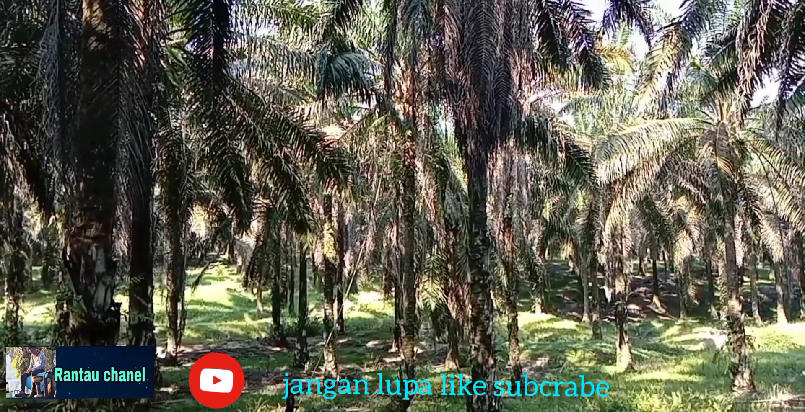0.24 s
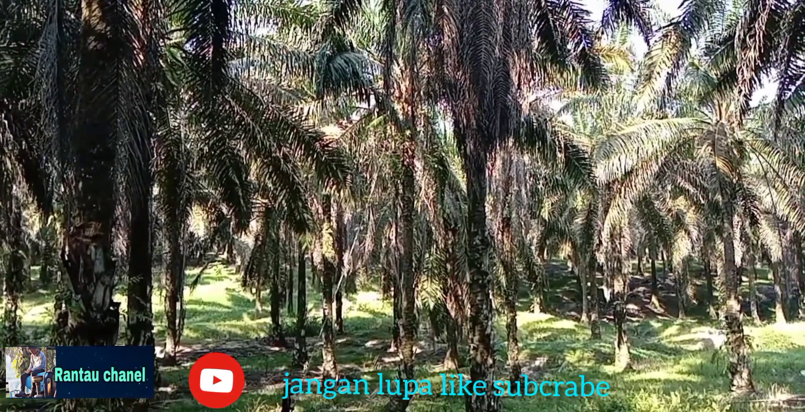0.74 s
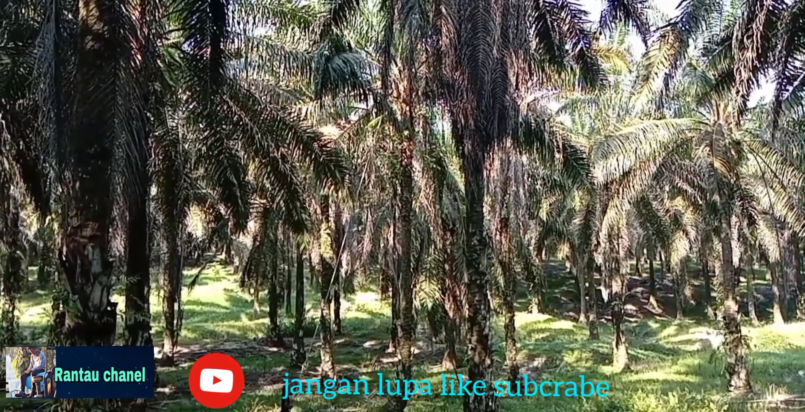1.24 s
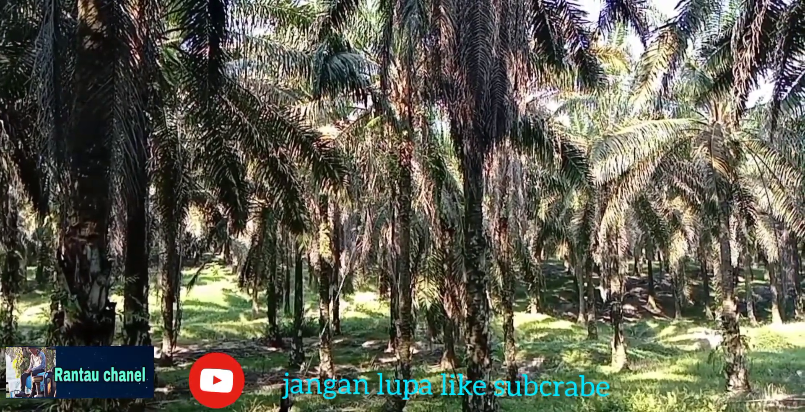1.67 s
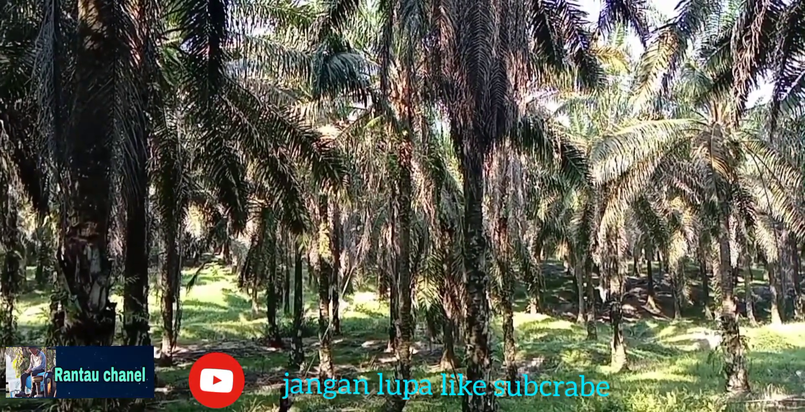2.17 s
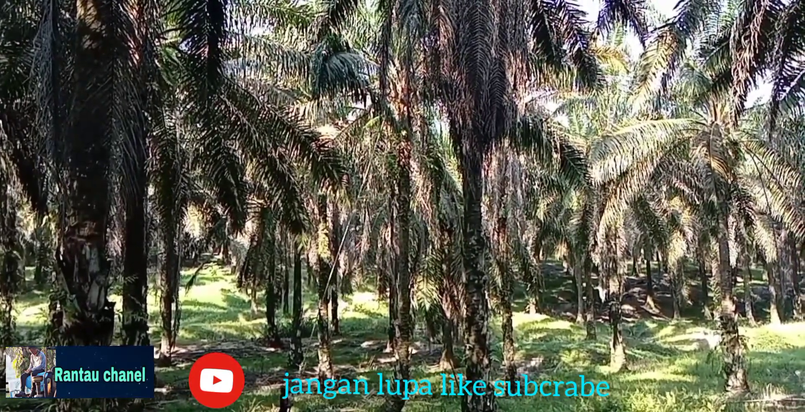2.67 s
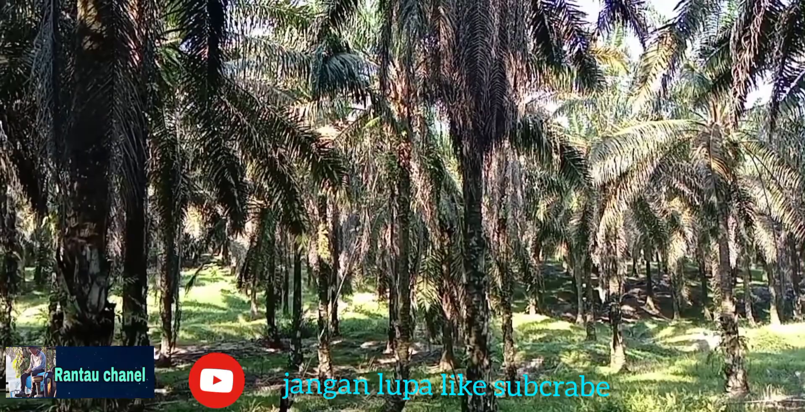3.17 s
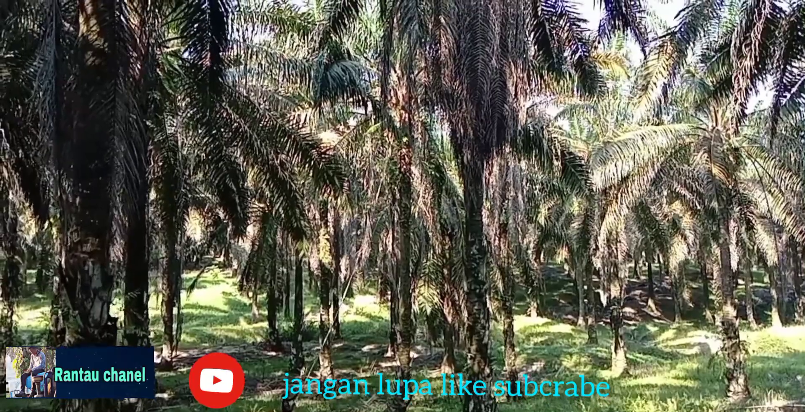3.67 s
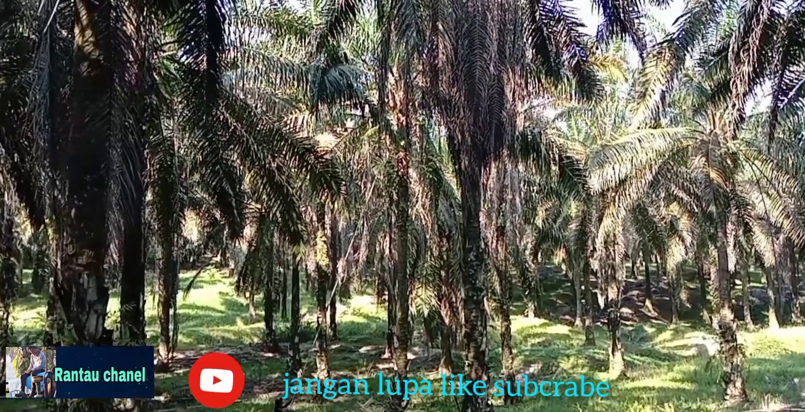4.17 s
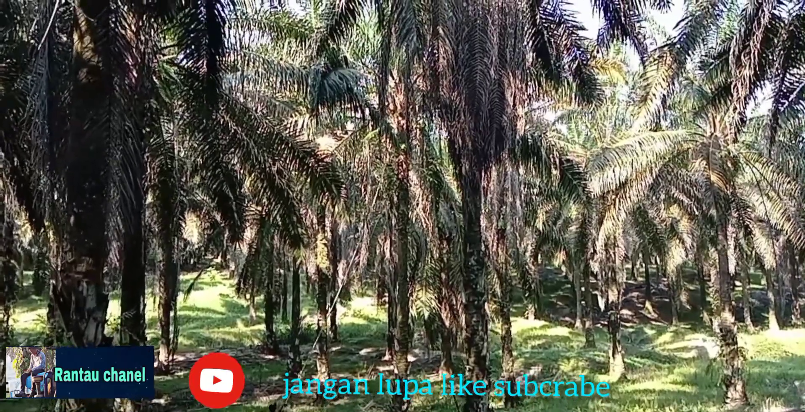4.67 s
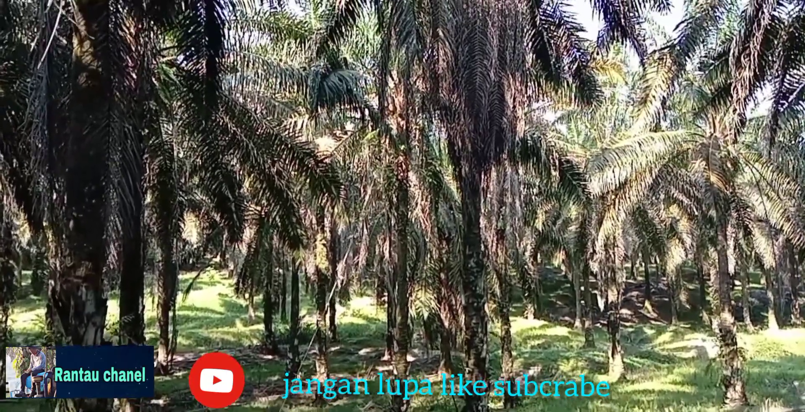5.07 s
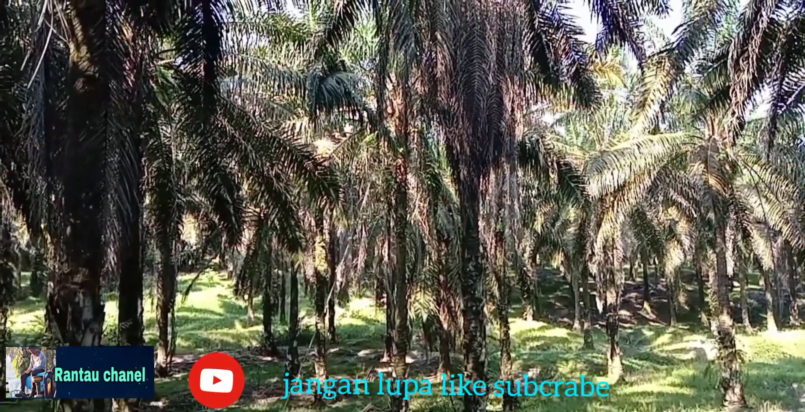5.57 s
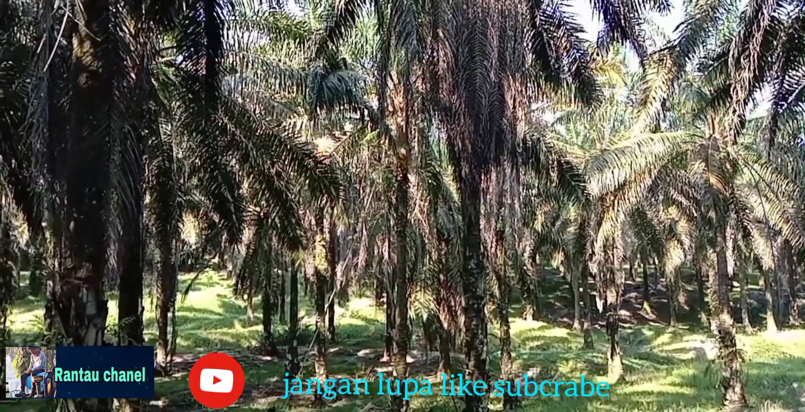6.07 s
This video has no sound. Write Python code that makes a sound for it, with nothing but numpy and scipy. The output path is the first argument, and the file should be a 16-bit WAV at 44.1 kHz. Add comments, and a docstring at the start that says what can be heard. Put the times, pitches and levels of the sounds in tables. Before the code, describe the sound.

Outdoors in a palm grove, a high insect buzz holds steady with crickets trilling in short pulsing bouts. Faint bird notes and twig ticks come first, then a clear gliding whistled phrase in the middle. Dry stalk snaps thicken afterwards, with two crackling frond swishes late on. A very faint far engine putters below. The microphone stays still, with light echo from trunks.

```python
"""Palm plantation with insects and a bird

A shrill insect chorus, from ringing tooth strikes, holds steady while crickets trill in gliding pulses.
A bird whistles a phrase of gliding tones; noise bursts ring dry stalks, and a falling tone is a twig tick.
Twice a frond swishes as a crowd of clicks; leaves rustle in a bed of rumble and hiss. Far off an engine
putters and a motor drones in rising tones. Trunks scatter the crickets, the bird and the snaps."""
import sys
import numpy as np
from scipy import signal
from scipy.fft import rfft, irfft
from scipy.io import wavfile
from scipy.ndimage import uniform_filter1d

SR = 44100
rng = np.random.default_rng(int(sys.argv[2]) if len(sys.argv) > 2 else 0)


def wav_out(sig):
    """Save sig, one row per channel (or a flat mono array), as 16-bit PCM at SR to the path in sys.argv[1]."""
    wavfile.write(sys.argv[1], SR, np.round(np.clip(np.atleast_2d(sig).T, -1, 1) * 32767).astype(np.int16))


N = 279594
TIME = np.arange(N) / SR  # s
BINS = np.fft.rfftfreq(N, 1 / SR)  # Hz


def amp(db):
    """Decibels to gain."""
    return 10 ** (np.asarray(db) / 20)


def unit(x):
    """Scales to rms 1."""
    return x / np.sqrt(np.mean(x ** 2) + 1e-20)


def follow(rows, t=TIME):
    """Reads every column of a breakpoint curve at times t."""
    s, *columns = np.transpose(rows)
    return [np.interp(t, s, column) for column in columns]


def add(mix, s, sound):
    """Mixes a sound in at time s, cut off at the end of the mix."""
    part = mix[max(round(s * SR), 0):][:len(sound)]
    part += sound[:len(part)]


def colour(x, spectrum):
    """Shapes x with a spectrum drawn over log frequency, at rms 1."""
    hz, db = np.transpose(spectrum)
    gain = amp(np.interp(np.log(BINS + 1), np.log(hz + 1), db))
    return unit(irfft(rfft(x) * gain, N))


def wander(rate_hz):
    """Random modulation of rms 1: noise rolled off smoothly around rate_hz."""
    rolloff = np.exp(-(BINS / rate_hz) ** 2)
    return unit(irfft(rfft(rng.standard_normal(N)) * rolloff, N))


def grains(per_s, spread_db):
    """Random clicks of uneven size and either sign, at rms 1."""
    size = amp(spread_db * np.minimum(rng.exponential(1, N), 4))
    sign = rng.choice([-1, 1], N)
    return unit(size * sign * (rng.random(N) < per_s / SR))


def ring(x, modes, order=2):
    """Passes x through parallel band-pass resonances, each (pitch_hz, width_hz, gain_db)."""
    out = 0
    for hz, width, db in modes:
        edges = np.clip([hz - width / 2, hz + width / 2], 10, SR / 2 - 10)
        band = signal.butter(order, edges, "band", fs=SR, output="sos")
        out = out + amp(db) * signal.sosfilt(band, x)
    return out


def grove(x, t60, onset):
    """Echoes from trunks and crowns: sparse taps that build up and die away."""
    t = TIME[:SR]
    taps = rng.standard_normal(SR) * (rng.random(SR) < 1500 / SR)
    taps = taps * amp(-60 * t / t60) * (1 - np.exp(-t / onset))
    return signal.fftconvolve(x, taps / np.linalg.norm(taps))[:N]


def whistle(curve, waver, edge=0.001):
    """A gliding near-sine with soft ends, its pitch wavering at random by the fraction waver."""
    start, end = curve[0][0], curve[-1][0]
    t = np.arange(start, max(end, start + edge), 1 / SR)
    hz, db = follow(curve, t)
    drift = unit(uniform_filter1d(rng.standard_normal(SR), size=130))[:len(t)]
    ends = np.clip(np.minimum(t - t[0], t[-1] - t) / edge, 0, 1)
    phase = 2 * np.pi * np.cumsum(hz * (1 + waver * drift)) / SR
    return np.sqrt(2) * amp(db) * ends * np.sin(phase)


# Spectrum of the rumble and hiss: frequency_hz, relative gain_db
AIR_SPECTRUM = [(25, -19), (45, -14), (90, 2), (160, 1.5), (240, -4.5), (330, -12), (600, -29),
                (1100, -26.5), (2000, -32), (3200, -19.5), (4100, -26), (5800, -17), (7400, -25.5),
                (8000, -41), (9000, -35.5), (12000, -42.5), (15500, -27)]
# Spectrum of the leaf crackle: frequency_hz, relative gain_db
LEAF_SPECTRUM = [(240, -44), (400, -6.5), (619, -8), (671, -11), (1230, -3.5), (1780, -5), (2040, -5.5),
                 (2280, -11.5), (3320, 2.5), (3970, -6.5), (4300, -5.5), (5590, 3), (9460, -120)]
# Brief rustles of leaves: peak_s, level_db, length_s
LEAF_RUSTLES = [(0, -54, 0.21), (1.068, -74, 0.83), (1.537, -58.5, 0.13), (1.804, -66.5, .2),
                (3.045, -59, 0.12), (3.75, -58.5, 0.44), (4.676, -63, 0.22), (4.9, -39.5, 0.055),
                (5.273, -57.5, 0.68), (6.041, -47.5, 0.22)]
RUSTLE_RISE_DB, RUSTLE_FALL_DB = 19.5, 13.5  # change over one length before and after the peak
LEAVES_FLOOR_DB = -79.5  # what the crackle keeps between rustles
STIR_FLOOR_DB, STIR_SHARE = -78.5, 0.17  # fixed part, plus this share of the crackle's gain


def air():
    """Noise shaped into rumble and hiss, with leaves as crackling clicks over a duller, banded stirring."""
    rustle = amp(LEAVES_FLOOR_DB)
    for peak, db, length in LEAF_RUSTLES:
        swell_db = np.minimum(RUSTLE_RISE_DB * (TIME - peak), RUSTLE_FALL_DB * (peak - TIME)) / length
        rustle = rustle + amp(db + swell_db)
    hiss = amp(-61.5) * colour(rng.standard_normal(N), AIR_SPECTRUM) * amp(2.4 * wander(9.0))
    stirring = np.zeros(N)
    for hz in np.geomspace(500, 2400, 7):  # each band stirs on its own
        stirring += ring(rng.standard_normal(N), [(hz, .3 * hz, 0)]) * amp(4 * wander(12))
    stir_gain = amp(STIR_FLOOR_DB) + STIR_SHARE * rustle
    return hiss + stir_gain * unit(stirring) + rustle * colour(grains(4000, 2.25), LEAF_SPECTRUM)


# Spells of a distant motor: start_s, end_s, first_pitch_hz, last_pitch_hz, level_db (before it wavers)
DRONE_SPELLS = [(-.2, 1.8, 61.5, 67, -68), (2.2, 3.48, 58.8, 59.5, -67.5), (3.98, 5.08, 47.8, 61.4, -68),
                (5.3, 5.9, 53, 58.26, -72), (6.0, 7, 49.6, 52, -75)]
DRONE_FADE_S = 0.12


def drone():
    """A distant motor hums as a low sine, gaining speed in each spell while its level wavers."""
    out = np.zeros(N)
    for start, end, first_hz, last_hz, db in DRONE_SPELLS:
        hz = np.interp(TIME, [start, end], [first_hz, last_hz])
        ends = np.clip(np.minimum(TIME - start, end - TIME) / DRONE_FADE_S, 0, 1)
        out += np.sqrt(2) * amp(db) * ends * np.sin(2 * np.pi * np.cumsum(hz) / SR)
    return out * amp(1.4 * wander(4.9))


# Speed of the far engine: time_s, firings_per_s
FIRING_RATE = [(0.0, 23.2), (0.88, 21.5), (1.2, 23), (1.43, 21.2), (1.87, 21.5), (2.31, 20.7), (2.93, 22.9),
               (3.58, 20.7), (3.81, 20.1), (4.18, 20.7), (4.5, 23.7), (5.0, 21.5), (5.35, 23.5), (5.74, 23),
               (5.91, 24.5), (6.34, 21.6)]
# Engine levels before the final trims: time_s, throb_db, thump_db (the harder upper thumps)
ENGINE_LEVELS = [(0.0, -58, -63), (0.05, -58.5, -69), (0.81, -59, -61.5), (1.94, -58, -69.5),
                 (1.98, -71, -71), (2.42, -57, -71.5), (2.83, -62, -62.5), (3.14, -67, -56.5),
                 (3.27, -58.5, -75), (3.34, -67.5, -60), (4.57, -57.5, -68.5), (4.59, -56, -57.5),
                 (5.14, -62, -59), (5.17, -68, -67), (5.24, -55.5, -83), (5.91, -63, -70), (5.95, -58, -59),
                 (6.34, -62, -73)]
# Partials of the throb: multiple of the firing rate, relative level_db
THROB_PARTIALS = [(2, -16.5), (4, -19), (5, 6), (6, 6.5), (7, -5)]
# Exhaust resonances: pitch_hz, width_hz, relative gain_db
EXHAUST_MODES = [(140.7, 54, -6.5), (207.2, 43, -1.5), (339.6, 26, -13)]


def engine():
    """A far single cylinder: uneven firing pulses ring its exhaust, over a throb of firing-rate harmonics."""
    (rate,), (throb_db, thump_db) = follow(FIRING_RATE), follow(ENGINE_LEVELS)
    turns = np.cumsum(rate) / SR  # firings so far
    firings = np.diff(np.floor(turns), prepend=0) * amp(2.5 * wander(25))
    thumps = unit(ring(firings, EXHAUST_MODES))
    throb = np.zeros(N)
    for multiple, db in THROB_PARTIALS:
        throb += amp(db + 1.8 * wander(4)) * np.cos(2 * np.pi * multiple * (turns - .2))
    return amp(throb_db - 1.0) * unit(throb) + amp(thump_db - 2.5) * thumps


# Insect bands: centre_hz, width_hz, level_db, strikes_per_s (a quarter of the band's total strike rate)
INSECT_BANDS = [(6702, 390, -60, 900), (7132, 340, -66, 1800), (4840, 570, -65.5, 250),
                (14690, 550, -74.5, 1500)]


def chorus():
    """Many insects: dense tooth strikes ring their wings, each kind in its own band."""
    out = np.zeros(N)
    for hz, width, db, strikes in INSECT_BANDS:
        wings = unit(ring(grains(4 * strikes, 0.4), [(hz, width, 0)]))
        out += amp(db + .5 * wander(11.0)) * wings
    return out


def trill(bouts, fall_hz, stroke, gap, uneven_db):
    """Pairs of wing strokes, each sliding down as the wing slows; a bout swells in and eases off."""
    out, u = np.zeros(N), np.linspace(0, 1, int(stroke * SR))
    for start, end, rate, db, top_hz in bouts:
        for s in np.arange(start, end, 1 / rate):
            ease_db = -6 * np.exp(-(s - start) / 0.058) - 2 * np.exp(-(end - s) / 0.04)
            for delay in (0, gap):
                late, size, detune, slide = rng.standard_normal(4)
                hz = top_hz * (1 + .006 * detune) - fall_hz * (1 + .1 * slide) * u ** 1.6
                pulse = np.sin(np.pi * u) * np.sin(2 * np.pi * np.cumsum(hz) / SR)
                gain = np.sqrt(2) * amp(db + ease_db + uneven_db * size)
                add(out, s + delay + .0007 * late, gain * pulse)
    return out


# Bouts of two near crickets, one lower: start_s, end_s, pulse_pairs_per_s, level_db (before trim), top_pitch_hz
CRICKET_BOUTS = [(.001, .07, 22, -52, 4970), (.17, 1.0, 23, -61.5, 4750), (.508, 1.13, 22, -55, 4950),
                 (1.603, 2.14, 22.1, -54.5, 4950), (1.65, 2.2, 23, -61, 4700), (2.68, 3.2, 22, -57.5, 4900),
                 (2.65, 3.2, 23, -62, 4700), (3.705, 4.08, 21.8, -55.5, 4930), (4.07, 4.7, 23, -59, 4720),
                 (4.362, 4.84, 22, -54.5, 4980), (5.202, 5.79, 22.7, -54, 4970),
                 (5.235, 5.7, 22.7, -60.5, 4660)]


def crickets():
    """Two crickets close by, and higher ones deeper among the palms that never stop."""
    near = trill(CRICKET_BOUTS, fall_hz=400, stroke=.012, gap=.014, uneven_db=1.0)
    high = trill([(0, 6.34, 26.5, -68, 5650)], fall_hz=750, stroke=.013, gap=.016, uneven_db=2.5)
    shrill = trill([(0, 9.2, 37, -61.0, 7050)], fall_hz=496, stroke=.009, gap=0.016, uneven_db=1.5)
    rasp = amp(1.6 * wander(350))  # the teeth of the file catch unevenly
    calls = (amp(0.3) * near + high + shrill) * rasp
    return calls + amp(-10) * grove(calls, t60=.28, onset=.004)


# Frond swishes: start_s, peak_s, level_db, rise_db_per_s, fall_db_per_s
FROND_SWISHES = [(4.765, 4.887, -38, 81, 81), (5.751, 6.065, -40.5, 56.5, 68)]
# Spectrum of the scraping leaflets: frequency_hz, relative gain_db
LEAFLET_SPECTRUM = [(1060, -61), (1800, -34.5), (2140, -21.5), (2340, -8), (3380, 7), (4470, -4),
                    (5400, -3), (6590, 2.5), (6890, -2.5), (7960, -24), (9280, -31), (12300, -24),
                    (13500, -24), (14700, -17), (15500, -9.5)]
# Spectrum of the whole frond's dull rush: frequency_hz, relative gain_db
RUSH_SPECTRUM = [(120, -48), (200, -0.5), (237, -22.5), (380, -4), (420, -19), (551, -7), (701, -10),
                 (1180, -5), (1280, -4), (2200, -10.5), (2860, -9), (4840, -120)]
SWISH_ATTACK_S, SWISH_RAGGED_DB = 0.053, 1
RUSH_DB, RUSH_SHARE = -8, 0.8  # rush against scrape at the peak; how much of the swell it follows


def fronds():
    """Dry leaflets scrape past each other in a crowd of tiny clicks, over the duller rush of the whole frond."""
    leaflets = grains(5000, 2.3) * amp(SWISH_RAGGED_DB * wander(96))
    scrape = colour(leaflets, LEAFLET_SPECTRUM)
    rush = colour(grains(3000, 0.93), RUSH_SPECTRUM)
    out = np.zeros(N)
    for start, peak, db, rise, fall in FROND_SWISHES:
        swell_db = np.minimum(rise * (TIME - peak), fall * (peak - TIME))
        contact = np.clip((TIME - start) / SWISH_ATTACK_S, 0, 1)
        out += amp(db) * contact * (amp(swell_db) * scrape + amp(RUSH_DB + RUSH_SHARE * swell_db) * rush)
    return out


# Low knock of a stalk: pitch_hz, width_hz, relative gain_db
KNOCK_MODES = [(338.5, 56, 2), (594, 91, -3)]
# Hollow ring of a stalk: multiple of its hollow pitch, width_hz, relative gain_db
HOLLOW_MODES = [(1.002, 296, -2.5), (2.1, 487, -11)]
# Bright crack of a stalk: pitch_hz, width_hz, relative gain_db
CRACK_MODES = [(3225, 1050, -2.5), (5710, 420, -7), (13000, 1600, -30.5)]
# Low knock against the hollow ring at 1 kHz; thicker, lower stalks knock harder
KNOCK_DB, KNOCK_DB_PER_OCTAVE = -11, 23
SNAP_ATTACK_S = 0.0016


def snap(crack_db, hollow_db, t60, hollow_hz):
    """A dying burst of fibre breaks that rings the stalk in three registers."""
    t = TIME[:SR // 4]
    flutter = unit(uniform_filter1d(rng.standard_normal(len(t)), size=70))
    fibres = rng.standard_normal(len(t)) * amp(2.5 * flutter)
    burst = fibres * amp(-60 * t / t60) * np.minimum(t / SNAP_ATTACK_S, 1)
    hollow = [(multiple * hollow_hz, width, db) for multiple, width, db in HOLLOW_MODES]
    knock_db = hollow_db + KNOCK_DB - KNOCK_DB_PER_OCTAVE * np.log2(hollow_hz / 1000)
    out = np.zeros(len(t))
    for modes, db in ((CRACK_MODES, crack_db), (KNOCK_MODES, knock_db), (hollow, hollow_db)):
        x = ring(burst, modes)
        loudest_rms = np.sqrt(uniform_filter1d(x ** 2, size=220).max())  # over 5 ms
        out += amp(db) * x / loudest_rms
    return out


# Loud snaps and knocks: start_s, crack_db, hollow_db, t60_s (time to die by 60 dB), hollow_pitch_hz
STALK_SNAPS = [(0.017, -50, -72, 0.043, 1400), (.9, -58.5, -66, 0.031, 1480),
               (1.071, -62.5, -62.5, 0.38, 1190), (1.466, -42, -58, 0.052, 1380),
               (1.507, -70, -59, 0.19, 1070), (1.641, -48.5, -71, 0.018, 1280),
               (1.973, -55, -77, 0.027, 1260), (2.584, -62, -60, 0.089, 1160),
               (2.86, -50.5, -65, .05, 1925), (3.53, -46, -56, 0.095, 747), (3.634, -48.5, -57, 0.027, 900),
               (3.751, -51, -56, 0.12, 860), (3.83, -47, -53.5, 0.025, 920),
               (3.838, -47.5, -52.5, 0.022, 890), (3.935, -53, -56, 0.041, 930),
               (4.04, -56, -59, 0.088, 810), (4.419, -60, -52.5, 0.03, 1280),
               (4.63, -52.5, -56.5, 0.18, 795), (4.664, -44, -54.5, 0.058, 990),
               (4.793, -43.5, -73, 0.018, 1285), (4.875, -33, -45, 0.012, 1380),
               (4.88, -33.5, -52, 0.028, 1000), (5.2077, -46, -47, 0.0083, 776),
               (5.2901, -45.5, -54, .032, 1099), (5.556, -44, -52, 0.047, 1183),
               (5.771, -49.5, -55.5, 0.043, 1050), (5.852, -50, -52, 0.077, 1004)]
# Glide of a sharp twig tick: time_s, pitch_hz, level_db (before trim)
TWIG_TICK = [(.727, 4500, -47), (.7285, 3050, -37), (.7305, 2100, -50), (.733, 1800, -59)]
FAINT_SNAPS_PER_S, FAINT_CRACK_DB, FAINT_HOLLOW_DB = 1.3, -66.5, -76  # levels before a random size


def stalks():
    """Dry stalks snap and ring, faint ones fall at random, and one twig ticks as a fast falling tone."""
    snaps = np.zeros(N)
    for s, *stalk in STALK_SNAPS:
        add(snaps, s, snap(*stalk))
    for when, size in rng.random((round(FAINT_SNAPS_PER_S * N / SR), 2)):
        faint = snap(FAINT_CRACK_DB, FAINT_HOLLOW_DB, t60=.1, hollow_hz=1490)
        add(snaps, when * N / SR, (.5 + size) * faint)
    snaps = snaps + amp(-5.0) * grove(snaps, t60=0.25, onset=0.00099)
    tick = np.zeros(N)  # a twig close by, with little echo
    add(tick, TWIG_TICK[0][0], whistle(TWIG_TICK, waver=.0069, edge=0.00051))
    return snaps + amp(-2) * tick + amp(-9.0) * grove(tick, t60=0.16, onset=0.0019)


NOTE_RISE_DB, NOTE_FALL_DB = 19.5, 13.5  # a note swells to its loudest point and sinks again
WARBLE_PER_S = 26


def note(start, length, first_hz, middle_hz, last_hz, db, loudest, warble):
    """One note as (time_s, pitch_hz, level_db): the pitch arcs, some warble, and the level swells and sinks."""
    u, top = np.linspace(0, 1, num=61), np.clip(loudest, .05, .95)
    arc = np.polyval(np.polyfit([0, .5, 1], [first_hz, middle_hz, last_hz], 2), u)
    hz = arc + warble * np.cos(2 * np.pi * WARBLE_PER_S * length * u)
    rise_sag_db = NOTE_RISE_DB * (1 - u / top) ** 2
    fall_sag_db = NOTE_FALL_DB * ((u - top) / (1 - top)) ** 2
    sag_db = np.where(u < top, rise_sag_db, fall_sag_db)
    return np.transpose([start + length * u, hz, db - sag_db])


# Bird notes: start_s, length_s, first_pitch_hz, middle_pitch_hz, last_pitch_hz, level_db (of the scattered
# sound's source), loudest_point (0-1 of the length), direct_db (relative to level_db), warble_depth_hz
BIRD_NOTES = [(0.205, 0.063, 2835, 2610, 3250, -61.5, 1, -1.5, 0),
              (.285, 0.07, 3950, 2880, 1770, -53.5, 0.1, -4, 0),
              (.6, 0.23, 3070, 2773, 2526, -66.5, 0.04, -6, 93),
              (0.928, .15, 2920, 2615, 2834, -63, 0.45, -5.5, -5),
              (1.37, 0.072, 3730, 3740, 3677, -79, .5, 8, -1.5),
              (2.081, 0.086, 3650, 3510, 3400, -50.5, 0.35, -11, 220),
              (2.324, .19, 2209, 3010, 3170, -49.5, 0.78, -0.5, 29),
              (2.502, 0.065, 3170, 3060, 3005, -47, 0.23, 3.5, -4),
              (2.671, 0.031, 3400, 3630, 3695, -46.5, 0.64, -1, -5),
              (2.688, .085, 3730, 3095, 2854, -45, 0.4, -1.5, 4),
              (2.896, .13, 4064, 3774, 3760, -45.5, 0.53, 0.5, -2),
              (3.018, 0.043, 3820, 4484, 4800, -48.5, 0.26, -0.5, 3.5),
              (3.155, 0.077, 5700, 4960, 4640, -47, 0.39, 1, -8),
              (3.286, 0.057, 3385, 3410, 3400, -49.5, 0.45, 9, 3),
              (3.349, 0.041, 3454, 3430, 3270, -42.5, 0.53, 0, -2),
              (3.428, 0.089, 3050, 3325, 3116, -46, 0.11, -9, 79),
              (3.577, 0.067, 2647, 2800, 3050, -52, 0.47, -2.5, 0),
              (4.526, 0.047, 3700, 3070, 1910, -58, 0.11, -2, 4)]


def birds():
    """Whistled notes that hang on between the trunks, and come back once more from a far row of palms."""
    direct, scattered = np.zeros(N), np.zeros(N)
    for start, *shape, direct_db, warble in BIRD_NOTES:
        sound = whistle(note(start, *shape, warble), waver=.006, edge=.004)
        add(direct, start, amp(direct_db) * sound)
        add(scattered, start, sound)
        add(scattered, start + 0.11, amp(-22) * sound)  # the far row
    return direct + grove(scattered, t60=1.0, onset=0.0027)


def scene():
    """Sums all sources into one channel."""
    background = air() + drone() + engine()
    insects = chorus() + crickets()
    return (background + insects + fronds() + stalks() + birds())[None]


EDGE_HZ = 15550  # cutoff of the closing low-pass, where the treble ends


def record(dry):
    """A steep linear-phase low-pass closes the treble above EDGE_HZ."""
    lowpass = signal.firwin(511, EDGE_HZ, window=("kaiser", 9), fs=SR)
    return signal.oaconvolve(dry, lowpass[None], "same")


dry = scene()
out = record(dry)
wav_out(out)
```